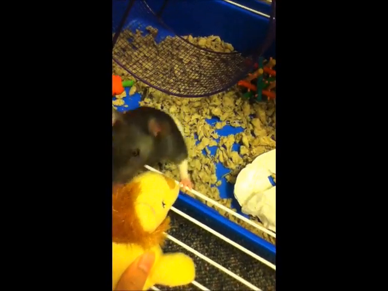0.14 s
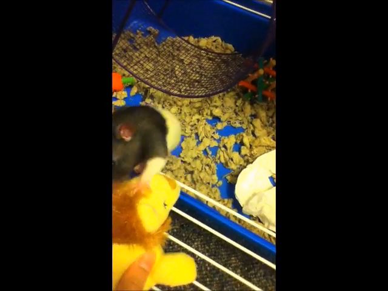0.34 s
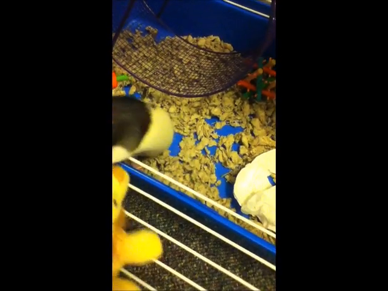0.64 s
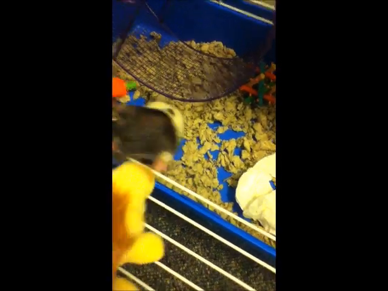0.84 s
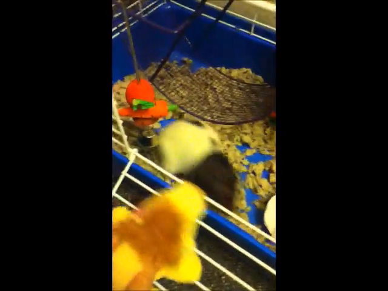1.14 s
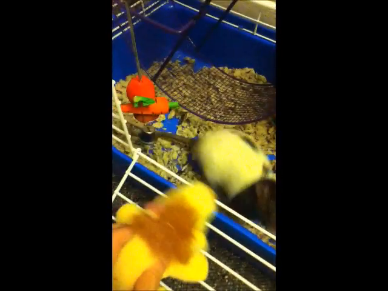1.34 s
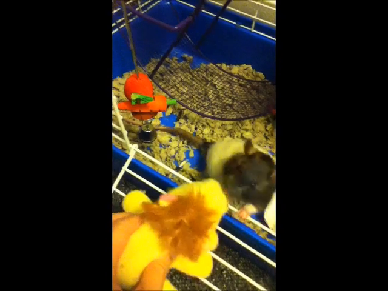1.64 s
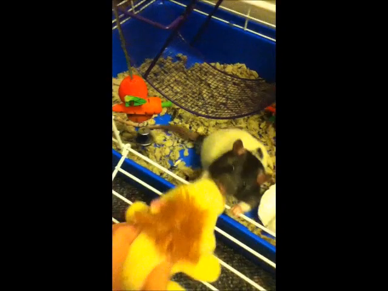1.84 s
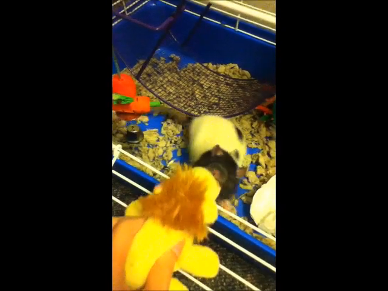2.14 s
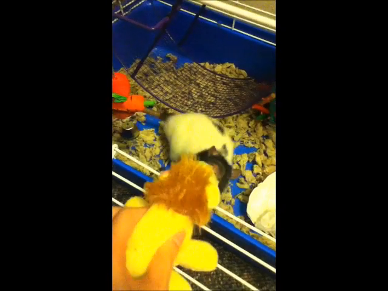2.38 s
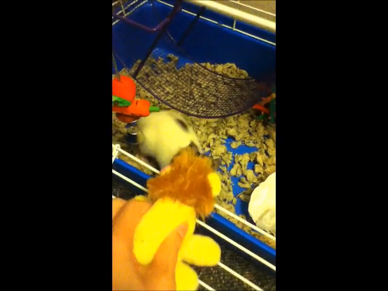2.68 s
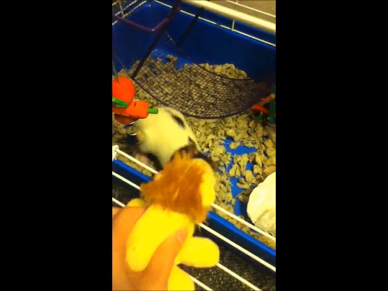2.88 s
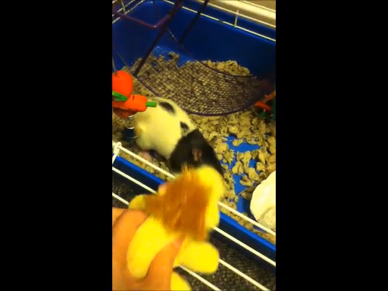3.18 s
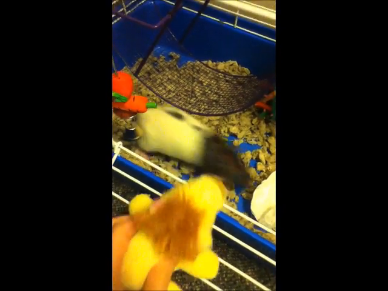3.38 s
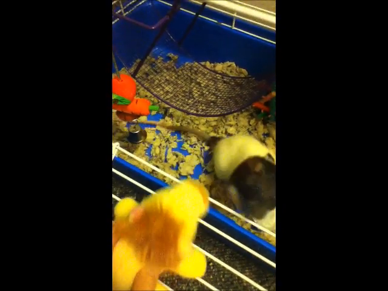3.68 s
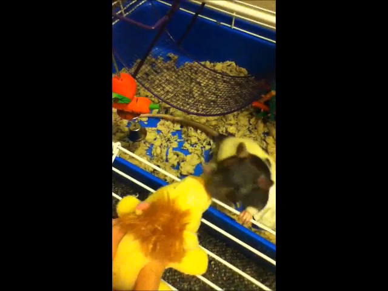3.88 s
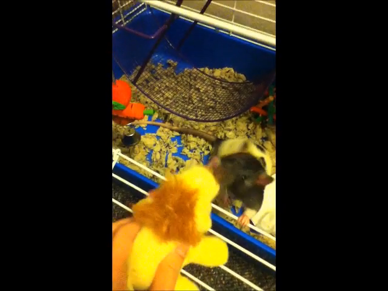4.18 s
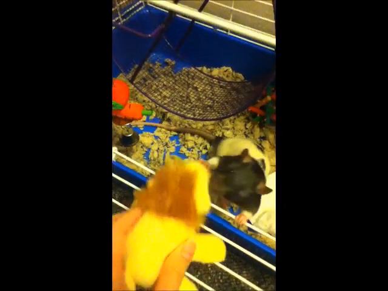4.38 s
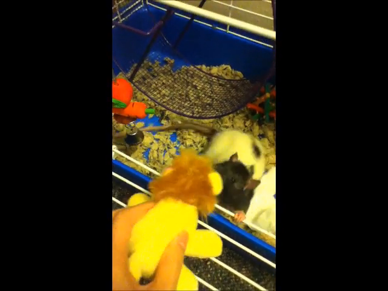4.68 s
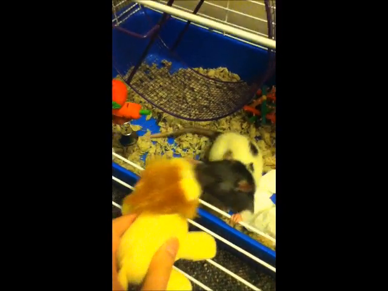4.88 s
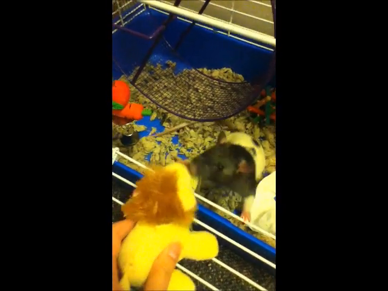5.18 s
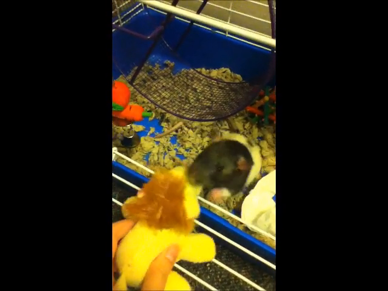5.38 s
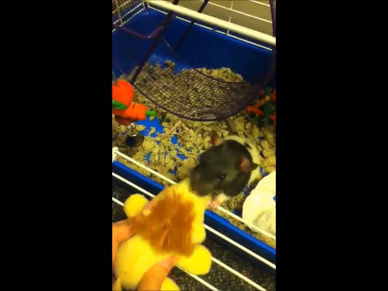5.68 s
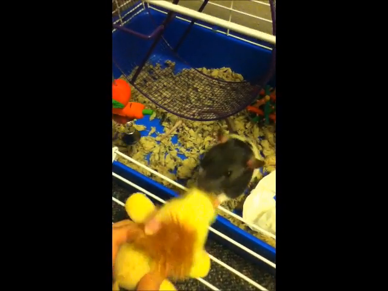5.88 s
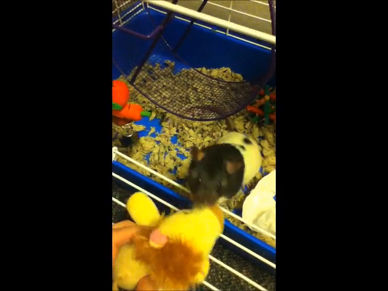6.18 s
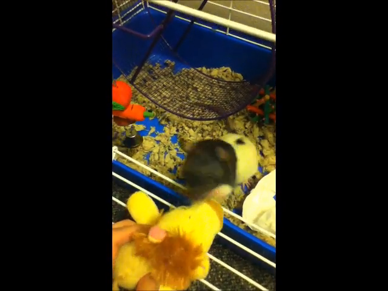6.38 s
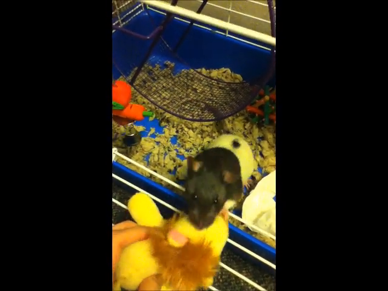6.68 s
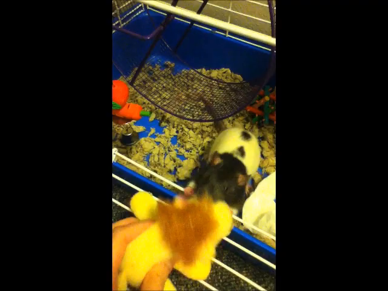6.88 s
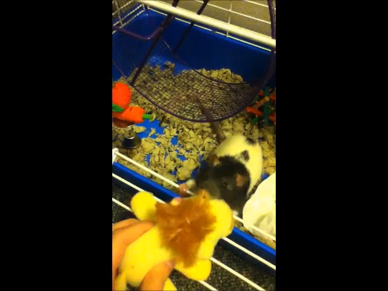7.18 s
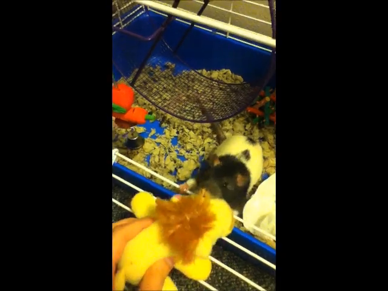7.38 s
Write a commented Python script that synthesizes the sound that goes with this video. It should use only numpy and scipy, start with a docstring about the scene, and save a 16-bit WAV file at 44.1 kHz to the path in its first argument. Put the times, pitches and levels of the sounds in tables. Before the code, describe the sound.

Close to a phone microphone in a small room, a plush toy's squeaker is squeezed in quick, pinched, nasal chirps, with snappy bulb pops and faint air hisses between. Behind it a rat jingles wires, sniffs, scrabbles in wood chips and bumps a light plastic tray. Squeaking stops just after four seconds; a hard clatter, claw ticks and late soft knocks follow over a low steady hum.

```python
"""Squeaky toy at a rat cage

Close to a phone, at the open door of a rat cage, a plush toy with a reed squeaker is squeezed in short bursts.
The reed is a stack of partials driven by bulb pressure; the bulb pops back and draws air as a puff of hiss.
Near it claws tick on the cage (snaps); behind it the rat sniffs (hiss), scrabbles (noise grains), knocks the
tray and shakes the wires (struck modes); there are faint peeps. A small room answers, and a noise hum with one
whining line lies underneath and ducks under the phone's gain control."""
import sys
import numpy as np
from scipy import signal
from scipy.fft import rfft, irfft
from scipy.io import wavfile
from scipy.ndimage import uniform_filter1d

SR = 44100
rng = np.random.default_rng(int(sys.argv[2]) if len(sys.argv) > 2 else 0)


def digitize_waveform(pressure):
    """Quantize a signal to 16-bit integers and store it at the path in sys.argv[1].

    Rows of a 2-D input are taken as channels; values are limited to [-1, 1].
    """
    field = np.atleast_2d(pressure).T
    bounded = np.clip(field, -1, 1)
    quanta = np.round(bounded * 32767).astype(np.int16)
    wavfile.write(sys.argv[1], SR, quanta)


N = 332514

# All levels are set ahead of the phone's microphone and gain control.
# room noise spectrum, relative: pitch_hz, level_db (per Hz)
HUM_SPECTRUM = [(40, -29), (75, -15), (95, -3.5), (181, -3.5), (366, -5), (669, -17.5), (904, -12.5),
                (1030, -14.5), (1460, -14), (1850, -23), (2500, -20.5), (3600, -22), (4150, -28),
                (4650, -25.5), (5400, -28.5), (15100, -38), (16300, -46)]
# how fast the room dies away: pitch_hz, t60_s
ROOM_DECAY = [(500, 0.27), (2500, 0.18), (6000, 0.15), (10000, .13), (15000, 0.048)]
# wires jingling: start_s, peak_db
SHAKES = [(0.1565, -44.5), (0.5844, -53), (0.611, -48), (0.6494, -55), (0.722, -48.5), (0.7594, -56),
          (0.7894, -56), (0.826, -51)]
# modes of the wires before detuning, relative: pitch_hz, level_db, t60_s
WIRE_MODES = [(7063, -9.5, .12), (8620, -10, 0.096), (8600, -11, .15), (9040, 0, .13), (10400, -22, .15),
              (10800, -13.5, .12), (11850, -11.5, .12), (13000, -8.5, 0.078), (12680, -22, 0.1),
              (13540, -13, 0.12), (14270, -17.5, 0.11)]
# faint falling peeps: start_s, length_s, level_db, start_hz, end_hz
PEEPS = [(5.078, 0.0196, -59, 9100, 8200), (5.139, 0.0053, -58, 9000, 7500)]
# quick puffs through the rat's nose: start_s, level_db
SNIFFS = [(1.155, -53), (1.2655, -62.5), (1.563, -63.5), (2.679, -63), (2.775, -57.5), (5.491, -64)]
# paws in the bedding: loudest_s, rise_s, fall_s, level_db, drag_db (on the tray, relative)
SCRABBLES = [(0.771, 0.26, 0.066, -60.5, -13), (2.46, 0.039, 0.071, -48, 2.5),
             (2.805, 0.05, 0.019, -51, 4.5), (3.545, .05, 0.034, -39.5, -5), (4.8, .07, 0.053, -46.5, 4.5),
             (4.88, 0.046, 0.033, -52, -2), (7.07, 0.13, 0.21, -53.5, 6.5)]
# bedding noise spectrum, relative: pitch_hz, level_db (per Hz)
BEDDING_SPECTRUM = [(710, -70), (1200, -5), (1900, -11.5), (2920, -13.5), (4720, -15.5), (11500, -26),
                    (13100, -54), (15500, -56)]
# blows on the tray: start_s, peak_db, contact_s, hardness_db (per octave, limited to -6..5),
# crack_db (against the ringing)
KNOCKS = [(1.425, -32, 0.005, -10, -6), (1.591, -34.5, 0.0047, -9, -6), (2.561, -30.5, 0.0044, -13, 5.5),
          (2.79, -35, 0.0035, -10, -17), (3.205, -38, 0.0056, 0, -11), (3.671, -36.5, 0.0055, -0.5, -6),
          (4.795, -22.5, 0.0048, 1, -2.5), (4.802, -24, 0.0043, -4.5, -1.5), (4.811, -33, 0.0025, -8, 14),
          (4.843, -28, 0.0028, 11, 5), (4.964, -42, .003, 3, -5), (5.017, -35.5, 0.0034, 7, -6),
          (6.873, -39.5, 0.0069, 4, -1), (6.93, -33.5, 0.013, 3, -8), (6.99, -38, 0.0094, 1, -2),
          (7.034, -36, 0.013, 1, 1.5)]
# modes of the plastic tray before detuning, relative: pitch_hz, level_db, t60_s
TRAY_MODES = [(387, -.5, 0.08), (547, -3, 0.02), (696, -2.5, 0.045), (794.6, 8, 0.022), (1187, -6, 0.03),
              (2082, -1, 0.007), (2630, -9, 0.01)]
# claws ticking on the cage: start_s, peak_db, ring_hz
TICKS = [(.0354, -39.5, 2520), (0.745, -29, 2560), (2.5647, -30.5, 3200), (3.5226, -25, 2400),
         (3.528, -27, 2394), (3.544, -27, 1930), (3.5536, -21.5, 1890), (4.5014, -38.5, 2800),
         (4.7557, -18.5, 2090), (4.7577, -23, 2030), (4.8455, -27, 2130), (4.9792, -36.5, 2300),
         (5.7325, -37, 2900), (5.736, -36, 3010), (5.7403, -26, 2530), (5.743, -27.5, 2290),
         (5.8317, -39, 3200), (5.8362, -37, 3300), (5.8394, -33, 2800), (7.2776, -27, 1900)]
# the bulb dents or pops back: start_s, peak_db
POPS = [(0.8271, -23), (1.0053, -23), (2.0579, -21), (2.9528, -21.5), (3.208, -17.5), (3.4277, -24.5),
        (3.8471, -15.5), (4.237, -14)]
# one row a squeeze: start_s, length_s, rise_s, level_db, start_db and sag_db (against level_db),
# start_hz, top_hz, let_go_hz, partial_1_db, partial_2_db, partial_3_db, partial_5_db, upper_partials_db,
# edge_db (upper slope above 10 kHz, per kHz), refill_wait_s (after the squeak ends)
SQUEAKS = [(0.8581, 0.03, 0.019, -20, -13.5, -1, 1215, 1287, 1299, 3.5, 1.5, 0.5, -17, 6.6, 3.5, 0.09),
           (0.9325, 0.04, 0.012, -13.5, -2.5, -7.5, 1418, 1461, 1303, -7.5, -2, -1, 0, 11, -0.6, 0.058),
           (1.3563, 0.034, 0.0042, -16.5, -1, -2.5, 1362, 1379, 1294, -9, -1, -6, -2.5, 11.2, -3, 0.066),
           (1.9427, 0.038, .013, -11.5, 0, -5.5, 1432, 1554, 1360, -7.5, -7, -5.5, -0.5, 8.3, -2, 0.087),
           (2.1604, 0.038, 0.0073, -16.5, 0, -3, 1426, 1435, 1302, -9, -6.5, -5, -.5, 10.8, -2, 0.061),
           (2.3403, 0.038, 0.0077, -15, -0.5, -3, 1418, 1412, 1307, -8, -4.5, -4.5, 1, 10, -0.2, 0.073),
           (2.8365, 0.036, 0.0061, -13, -1.5, -6.5, 1420, 1550, 1336, -5.5, -5, -2.5, 0.5, 10.6, 0.5, 0.091),
           (3.0844, 0.045, .019, -15, -4.5, -2.5, 1360, 1443, 1332, -10, -12.5, -3, -2, 10.4, 0.9, 0.085),
           (3.353, 0.035, 0.0062, -19, -2.5, -2.5, 1344, 1368, 1297, -6.5, -6, -4.5, 0.5, 10, 1.5, 0.078),
           (3.7278, 0.033, 0.01, -14.5, -1.5, -3, 1375, 1408, 1337, -8.5, 1, -8, -1.5, 11.9, -3, 0.11),
           (4.141, 0.047, 0.011, -18.5, 2.5, -0.5, 1380, 1365, 1300, -7, -2, -7, -1, 11.9, -2.5, 0.084)]
# the reed's upper spectrum, relative: pitch_hz, level_db
REED_TOP = [(7000, -5.5), (7600, -14.5), (8300, -6), (9200, -4), (10000, -11.5), (11000, -24.5),
            (12500, -35.5), (14000, -47.5), (16000, -52.5)]

HUM_DB, WHINE_HZ, WHINE_DB = -50.5, 908.6, -62.5
SNIFF_S = 0.035
SCRABBLE_ENDS_DB, SCRABBLE_BEND = -27, 1.7
TICK_RATTLE_DB = -9.5
POP_HZ, POP_RATTLE_DB = 2310, -17
REFILL_S, REFILL_DB = 0.053, -59
RISE_BEND, SAG_BEND = 1.4, 1.7  # how the pitch rounds off before and after its top
SAG_DB_BEND = 0.8  # how the level sags; RISE_BEND shapes its rise too
RELEASE_S, RELEASE_HZ, RELEASE_DB = 0.009, 105, -10.5  # the fingers let go and the reed stalls
ATTACK_S, CLOSE_S = 0.0015, 0.0025  # the reed starts and stops
USUAL_HZ = 1410
FOURTH_DB, FOURTH_DB_PER_HZ = 0.25, -0.0235  # partial 4 at USUAL_HZ, and its change with top pitch
TOY_ROOM_DB, CAGE_ROOM_DB = -19.5, -9.5  # the closer layer excites less room against its direct sound
EDGE_HZ = 16400  # top of the phone's band


def gain_of(db):
    """Decibels to an amplitude factor."""
    return 10 ** (np.asarray(db) / 20)


def evened(x):
    """Scales to rms 1."""
    return x / np.sqrt(np.mean(x ** 2) + 1e-20)


def peaked(x, db):
    """Scales to a peak level."""
    return gain_of(db) * x / np.abs(x).max()


def smoothed_twice(x, width):
    """Two running means in a row, for slow wandering."""
    return uniform_filter1d(uniform_filter1d(x, width), width)


def read(points, hz):
    """Looks a value up on a log-frequency axis."""
    f, value = np.transpose(points)
    return np.interp(np.log(hz + 1), np.log(f + 1), value)


def add(mix, s, sound):
    """Mixes a sound in at a time in seconds."""
    part = mix[round(s * SR):][:len(sound)]
    part += sound[:len(part)]


def coloured(x, points):
    """Filters by a spectrum in dB."""
    spectrum_db = read(points, np.fft.rfftfreq(len(x), 1 / SR))
    return irfft(rfft(x) * gain_of(spectrum_db), len(x))


def ring(modes, tilt_db=0., detune=0.93):
    """Impulse response of dying modes: a harder blow (tilt, dB per octave) favours the high ones."""
    t = np.arange(SR // 8) / SR
    total = 0
    for (hz, db, t60), factor in zip(modes, detune * np.ones(len(modes))):
        fading_db = db + tilt_db * np.log2(hz / 700) - 60 * t / t60
        total = total + gain_of(fading_db) * np.sin(2 * np.pi * hz * factor * t)
    return total


def hum():
    """Steady coloured room noise whose bands drift in slow patches."""
    frames, hz = N // 256 + 5, np.fft.rfftfreq(1024, 1 / SR)
    real, imaginary, patches = rng.standard_normal((3, 513, frames))
    patches = evened(uniform_filter1d(uniform_filter1d(patches, 12, 0), 14, 1))
    level_db = read(HUM_SPECTRUM, hz)[:, None] + 0.75 * patches
    wash = signal.istft((real + 1j * imaginary) * gain_of(level_db), nperseg=1024, noverlap=768)[1][:N]
    return gain_of(HUM_DB) * evened(wash)


def whine():
    """One sine line whose pitch drifts and whose level flutters slightly."""
    drift, flutter = (evened(smoothed_twice(v, 1500)) for v in rng.standard_normal((2, N)))
    turns = np.cumsum(WHINE_HZ + 2.7 * drift) / SR
    return gain_of(WHINE_DB + 2.3 * flutter) * np.sqrt(2) * np.sin(2 * np.pi * turns)


def room(x):
    """Sparse reflections of random sign, each band dying at its own speed."""
    taps = np.zeros(SR // 2)
    at = np.arange(120, len(taps) - 20, 20)
    taps[at + rng.integers(0, 20, len(at))] = rng.choice([-1., 1.], len(at))
    hz, t, bands = signal.stft(taps, SR, nperseg=128)
    fading = gain_of(-60 * t / read(ROOM_DECAY, hz)[:, None])
    tail = signal.istft(bands * fading, SR, nperseg=128)[1]
    return signal.fftconvolve(x, tail / np.linalg.norm(tail))[:N]


def shake(db):
    """Wires chatter together for a moment, each mode detuned afresh, inside a thin metallic hiss."""
    chatter = rng.standard_normal(1500) ** 3 * np.exp(-np.arange(1500) / 500)
    detune = rng.uniform(0.9, 1.01, len(WIRE_MODES))
    rings = signal.fftconvolve(chatter, ring(WIRE_MODES, detune=detune))[:5000]
    hiss = coloured(rng.standard_normal(5000), [(5500, -30), (8000, -1.5), (12000, -2.5), (15500, -7.5)])
    hiss = hiss * np.exp(-np.arange(5000) / 1500)
    return peaked(evened(rings) + 0.8 * evened(hiss), db)


def peep(length, db, start_hz, end_hz):
    """A thin whistled tone: one sine gliding down."""
    hz = np.linspace(start_hz, end_hz, round(length * SR))
    tone = np.sqrt(2) * np.sin(2 * np.pi * np.cumsum(hz) / SR)
    return gain_of(db) * tone * signal.windows.tukey(len(hz), 0.6)


def puff(db, length):
    """Air hissing through a tiny hole: noise in a band near 9 kHz, faded in and out."""
    hole = [(6000, -29.0), (7800, -17.5), (9000, -6.5), (10000, -18.0), (12500, -27.5)]
    hiss = evened(coloured(rng.standard_normal(4000), hole))
    count = round(length * SR)
    return gain_of(db) * hiss[:count] * signal.windows.tukey(count, 0.6)


def sniff(db):
    """A quick puff of air through the rat's nose."""
    return puff(db, SNIFF_S)


def scrabble(rise, fall, level_db, drag_db):
    """Wood chips crack in a dense, uneven stream of grains and drag on the tray."""
    t = np.arange(-rise, fall, 1 / SR)
    count = len(t)
    db = level_db + SCRABBLE_ENDS_DB * np.maximum(-t / rise, t / fall) ** SCRABBLE_BEND
    size = gain_of(3 * np.minimum(rng.exponential(1, count), 4))
    size = size * (rng.random(count) < 1500 / SR)  # about 1500 grains a second
    smear = rng.standard_normal(130) * np.exp(-np.arange(130) / 25)
    grains = signal.fftconvolve(size * rng.standard_normal(count), smear)[:count]
    grains = grains + 0.9 * rng.standard_normal(count)
    drag = signal.fftconvolve(grains, ring(TRAY_MODES))[:count]
    rustle = evened(coloured(grains, BEDDING_SPECTRUM)) + gain_of(drag_db) * evened(drag)
    return gain_of(db) * rustle * signal.windows.tukey(count, 0.15)


def knock(db, contact, hardness_db, crack_db):
    """A short gritty contact cracks at once and sets the tray ringing."""
    noise, u = rng.standard_normal(2000), np.arange(2000) / (contact * SR + 1)
    push = noise * (1 - np.exp(-3 * u)) * np.exp(-u)
    detune = rng.uniform(0.92, 1.065, len(TRAY_MODES))
    body = signal.fftconvolve(push, ring(TRAY_MODES, np.clip(hardness_db, -6, 5), detune))[:4000]
    crack = coloured(noise, BEDDING_SPECTRUM) * np.exp(-1.5 * u)
    add(body, 0, np.abs(body).max() * peaked(crack, crack_db))
    light = signal.lfilter(*signal.butter(2, 200, "high", fs=SR), body)  # the knock keeps no deep thump
    return peaked(light, db)


def snap(db, hz, rattle_db):
    """A one-cycle snap, a short hollow ring under it and a brief rattle."""
    t = np.arange(500) / SR
    click = np.exp(-((t - 0.00012) * hz * 3.2) ** 2) * np.sin(2 * np.pi * 1.5 * hz * (t - 0.00005))
    hollow = 0.33 * gain_of(-60 * t / 0.007) * np.sin(2 * np.pi * hz * t)
    soft = signal.lfilter(*signal.butter(2, 6000, fs=SR), click + hollow)  # the snap carries little treble above 6 kHz
    rattle = coloured(rng.standard_normal(len(t)), [(1000, -38.5), (1600, -18.5), (2500, 3.0),
                                                    (5000, -2.5), (9000, -13), (15000, -26)])
    rattle_gain = gain_of(rattle_db - 60 * t / 0.018) * np.minimum(t / 0.0003, 1)
    return peaked(soft + rattle_gain * evened(rattle), db)


def claw_tick(db, hz):
    """A claw on the cage: a snap with a strong rattle."""
    return snap(db, hz, TICK_RATTLE_DB)


def bulb_pop(db):
    """The bulb wall dents or springs back: a snap with little rattle."""
    return snap(db, POP_HZ, POP_RATTLE_DB)


def refill():
    """The bulb draws air back in."""
    return puff(REFILL_DB, REFILL_S)


def squeeze(length, rise, level_db, start_db, sag_db, start_hz, top_hz, let_go_hz):
    """Level and pitch follow the pressure in the bulb: up to a top, a slow sag, a quick release."""
    t, let_go = np.arange(0, length, 1 / SR), length - RELEASE_S
    up = np.clip(1 - t / rise, 0, 1) ** RISE_BEND
    sag = np.clip((t - rise) / max(let_go - rise, 1e-3), 0, 1)
    off = np.clip((t - let_go) / RELEASE_S, 0, 1)
    db = level_db + start_db * up + sag_db * sag ** SAG_DB_BEND + RELEASE_DB * off
    hz = top_hz - (top_hz - start_hz) * up - (top_hz - let_go_hz) * sag ** SAG_BEND - RELEASE_HZ * off
    return db, hz


def squeak(*row):
    """The reed slams shut once a cycle: sharp pulses that ring near 9 kHz, with a little escaping air."""
    *press, first_db, second_db, third_db, fifth_db, upper_db, edge_db = row
    db, hz = uniform_filter1d(squeeze(*press), 100, mode="nearest")
    count = len(hz)
    fourth_db = FOURTH_DB + FOURTH_DB_PER_HZ * (hz.max() - USUAL_HZ)
    low_db = [first_db, second_db, third_db, fourth_db, fifth_db]
    wobble = evened(uniform_filter1d(rng.standard_normal(count), 60))
    turns = np.cumsum(hz * (1 + 0.002 * wobble)) / SR
    reed = 0
    for k in range(1, 12):
        if k <= len(low_db):
            waver = evened(smoothed_twice(rng.standard_normal(count), 300))
            partial_db = low_db[k - 1] + 1.6 * waver  # each low partial wavers slowly in level
        else:
            above_khz = np.maximum(k * hz / 1e3 - 10, 0)
            partial_db = upper_db + edge_db * above_khz + read(REED_TOP, k * hz)
        lag = 1.3 * np.arctan2(k * hz * 1500, 8700 ** 2 - (k * hz) ** 2)  # the ring trails the pulse
        reed = reed - gain_of(partial_db) * np.cos(2 * np.pi * k * turns - lag)
    air = evened(coloured(rng.standard_normal(count), [(600, -27), (1200, -14.0)] + REED_TOP))
    t = np.arange(count) / SR
    edges = np.minimum(np.minimum(t / ATTACK_S, t[::-1] / CLOSE_S), 1)
    return gain_of(db) * edges * (reed + gain_of(-18) * air)


def scene():
    """Squeaks, pops and claw ticks near the phone, the refill hiss and other cage sounds behind, in a room."""
    near, behind = np.zeros((2, N))
    for table, source in ((SNIFFS, sniff), (KNOCKS, knock), (SHAKES, shake), (PEEPS, peep)):
        for s, *rest in table:
            add(behind, s, source(*rest))
    for s, rise, *rest in SCRABBLES:
        add(behind, s - rise, scrabble(rise, *rest))
    for table, source in ((TICKS, claw_tick), (POPS, bulb_pop)):
        for s, *rest in table:
            add(near, s, source(*rest))
    for s, length, *rest, wait in SQUEAKS:
        add(near, s, squeak(length, *rest))
        add(behind, s + length + wait, refill())
    around = room(gain_of(TOY_ROOM_DB) * near + gain_of(CAGE_ROOM_DB) * behind)
    return (near + behind + around + hum() + whine())[None]


def record(dry):
    """The microphone lacks deep bass; gain control ducks loud sounds and creeps back; then the band limit."""
    heard = signal.sosfilt(signal.butter(2, 70, "high", fs=SR, output="sos"), dry)
    power_db = 10 * np.log10(abs(uniform_filter1d(heard[0] ** 2, 700)) + 1e-12)
    over_db, t = np.maximum(power_db + 32, 1e-3), np.arange(N) / SR  # excess above -32 dB
    # the excess is caught at once, then decays with a time constant of 0.35 s
    held_db = np.exp(np.maximum.accumulate(np.log(over_db) + t / 0.35) - t / 0.35)
    keep = np.exp(-1 / (0.6 * SR))
    memory_db = signal.lfilter([1 - keep], [1, -keep], held_db)  # a run of loud sounds holds the gain lower
    ducked = heard / gain_of(0.27 * uniform_filter1d(held_db, 200) + 0.07 * memory_db)
    band_limit = signal.firwin(511, EDGE_HZ, window=("kaiser", 9), fs=SR)
    return signal.oaconvolve(ducked, band_limit[None], "same")


dry = scene()
out = record(dry)
digitize_waveform(out)
```